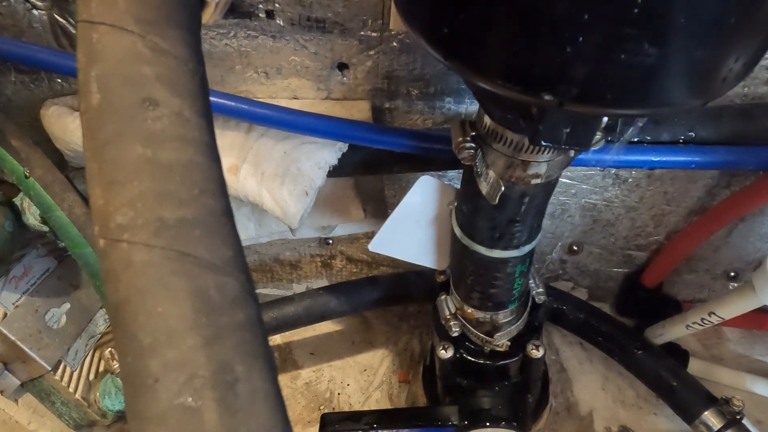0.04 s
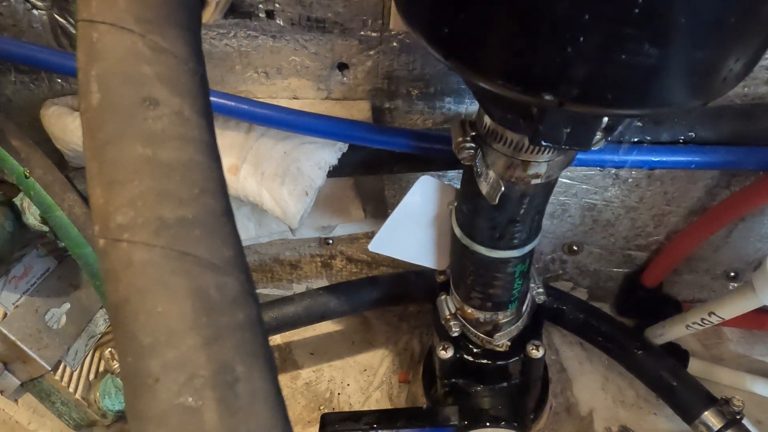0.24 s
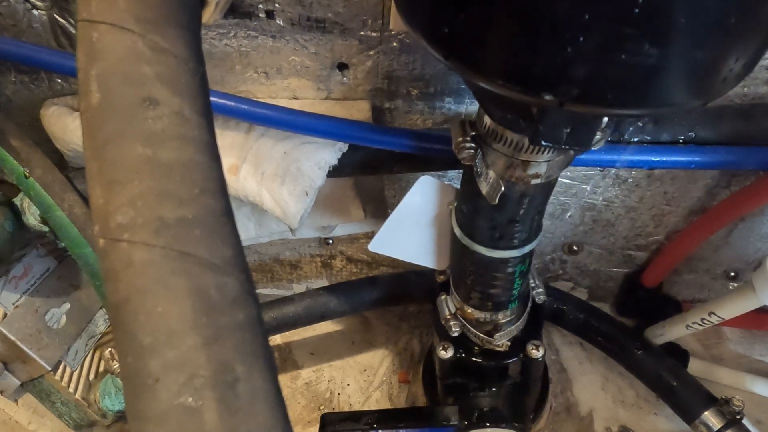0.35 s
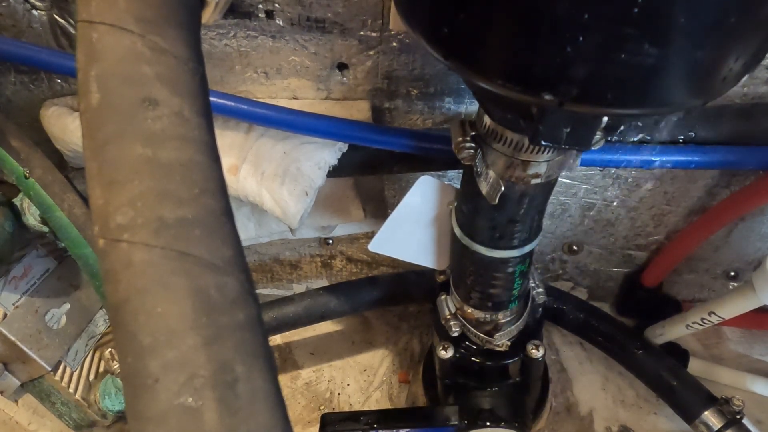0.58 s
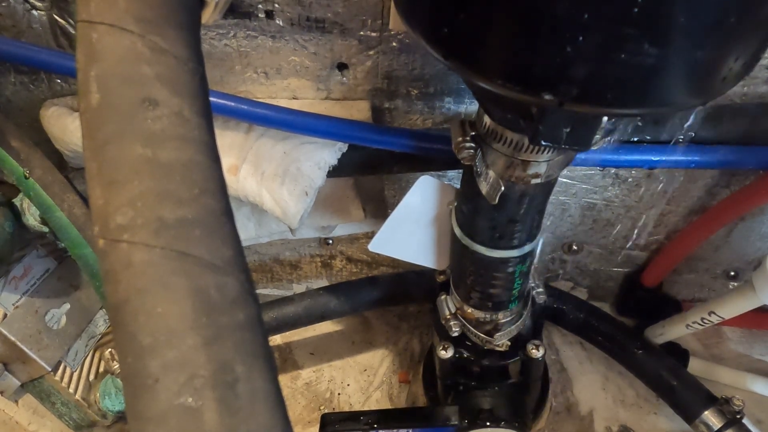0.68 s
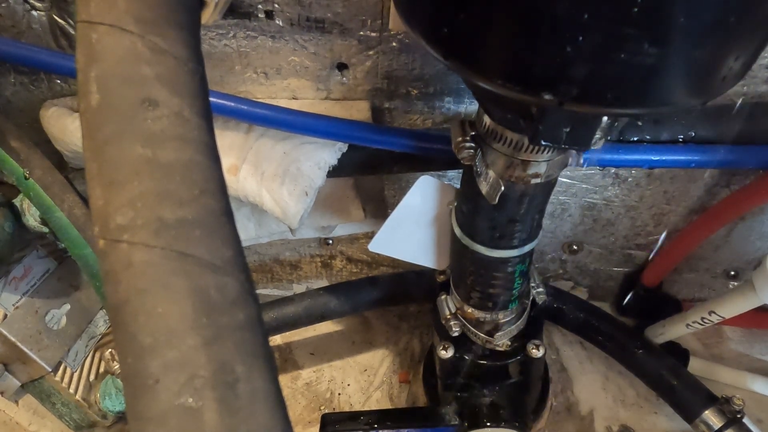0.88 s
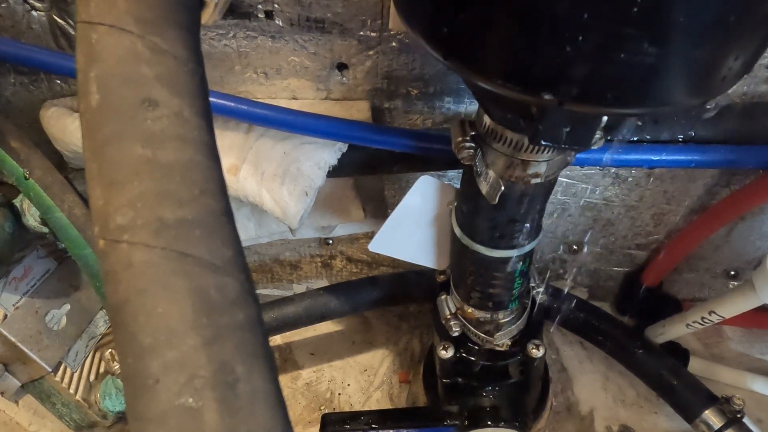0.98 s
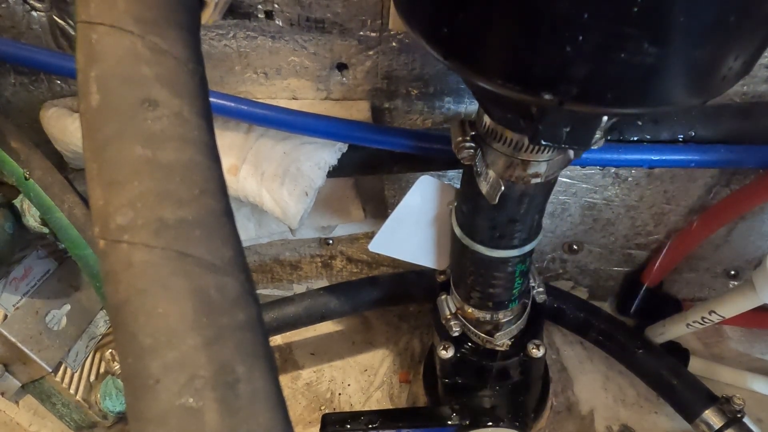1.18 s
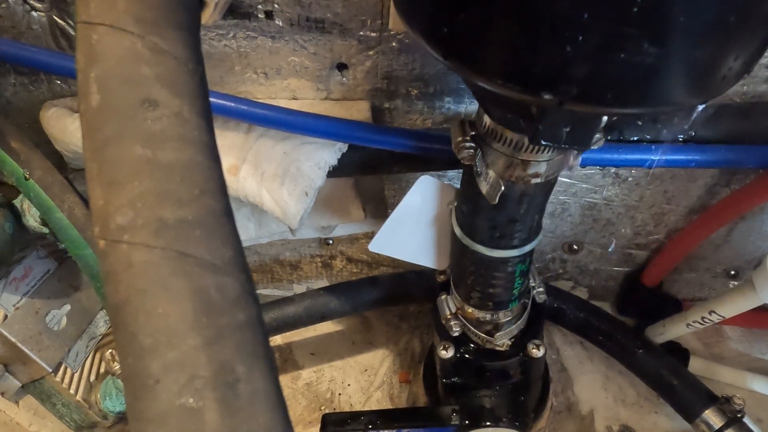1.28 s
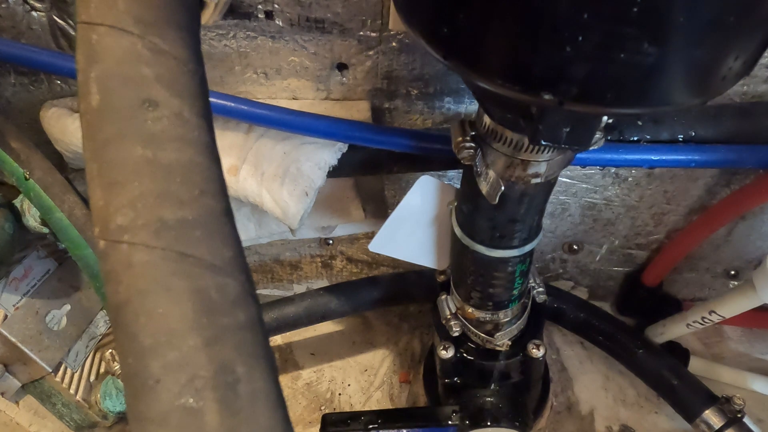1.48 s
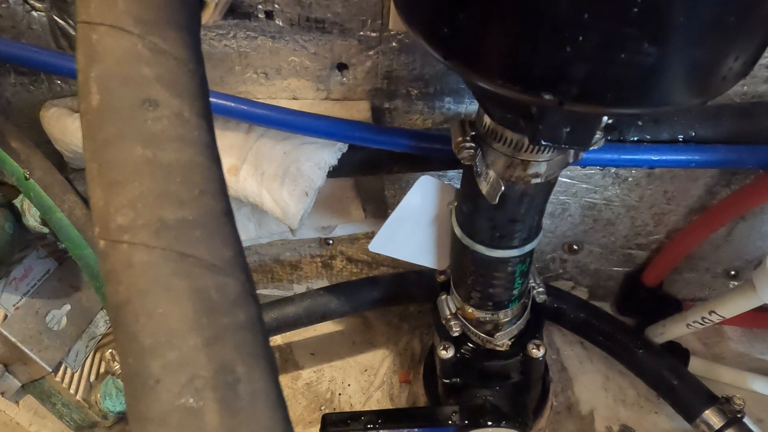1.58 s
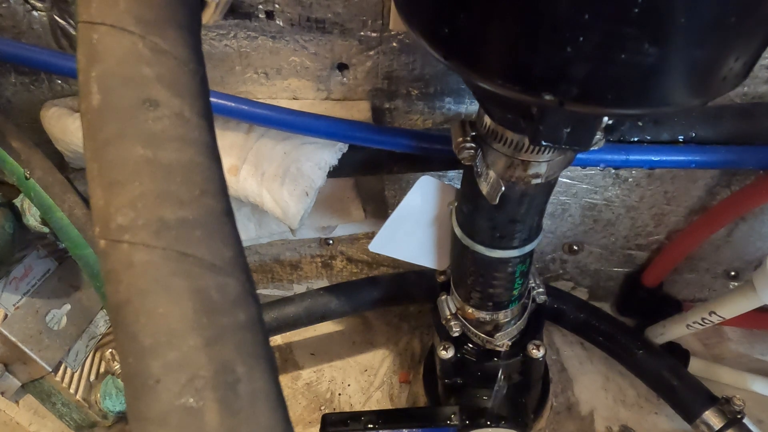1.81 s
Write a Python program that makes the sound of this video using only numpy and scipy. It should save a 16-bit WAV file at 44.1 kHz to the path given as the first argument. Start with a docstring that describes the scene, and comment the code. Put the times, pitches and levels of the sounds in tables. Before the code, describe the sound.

A leaky hose fitting spurts and drips water in uneven bursts over a faint hum.

```python
"""Water and air sputter from a leaking hose fitting in a boat's engine compartment.
A low hum and a faint drizzle run throughout. Spurts start at once: each is a cluster of tiny impacts
that rings the hose and housing (the low notes swell late) and throws spray. Puffs of mist and single
plinking droplets are scattered among the spurts. Near the end a fine jet, faint until then, grows
into a hiss. The cramped bay adds a short echo to the spurts, puffs and drops."""
import sys
import numpy as np
from scipy import signal
from scipy.fft import rfft, irfft, next_fast_len
from scipy.io import wavfile
from scipy.ndimage import uniform_filter1d

SR = 44100
rng = np.random.default_rng(int(sys.argv[2]) if len(sys.argv) > 2 else 0)


def generate_wav(sig):
    """Save sig (samples, or channels by samples) to the path in sys.argv[1] as 16-bit PCM at SR."""
    pcm = np.round(np.clip(np.atleast_2d(sig).T, -1, 1) * 32767).astype(np.int16)
    wavfile.write(sys.argv[1], SR, pcm)


N = 81585

# The housing's five pitch ranges, low to high: boom, thud, gulp, clack, knock.
# (delay [s], swell time [s], share of the small impacts it feels [0-1])
REGISTERS = [(0.0019, 0.0067, 0.23), (0.0021, 0.0049, 0.22), (.0008, 0.0025, 0.21),
             (0.00059, 0.00058, 0.85), (0.00048, 0.00033, 0.22)]
# Tone of the finest spray: (frequency [Hz], relative level [dB])
FIZZ_COLOUR = [(3000, -56), (5500, 13.5), (7300, 4.5), (8500, -8), (9150, -25), (10000, 0.5), (11000, 1.5),
               (12200, -21), (15500, -35)]
IMPACTS_PER_S, IMPACT_SPREAD_DB = 2000, 2


def undb(db):
    """Turn decibels into a number to multiply by."""
    return 10 ** (np.asarray(db) / 20)


def level(x, db):
    """Set a sound's average (rms) level."""
    return x * undb(db) / np.sqrt(np.mean(x ** 2) + 1e-20)


def burst_level(x, db, size=110):
    """Set the level of the loudest few milliseconds."""
    return x * undb(db) / np.sqrt(uniform_filter1d(x ** 2, size).max() + 1e-20)


def add(out, x, start_s):
    """Mix a sound in at a given time."""
    i = max(int(start_s * SR), 0)
    out[i:i + len(x)] += x[:max(len(out) - i, 0)]


def fade(t, t60):
    """Die away by 60 dB in t60 seconds, the fade time."""
    return np.exp(-np.log(1000) * t / t60)


def colour(x, points):
    """Shape a sound's tone along (frequency [Hz], level [dB]) points."""
    size = 2 * next_fast_len(len(x))
    hz, db = np.array(points, float).T
    freqs = np.maximum(np.fft.rfftfreq(size, 1 / SR), 1)
    gain = undb(np.interp(np.log(freqs), np.log(hz), db))
    cepstrum = irfft(np.log(gain))
    # Fold it in half so the filter rings only after a click, never before.
    cepstrum[1:size // 2] *= 2
    cepstrum[size // 2 + 1:] = 0
    return irfft(rfft(x, size) * np.exp(rfft(cepstrum)))[:len(x)]


def narrow_noise(hz, width_hz, db):
    """Noise squeezed around one pitch sounds like a wavering tone."""
    freqs = np.fft.rfftfreq(N, 1 / SR)
    spectrum = rfft(rng.standard_normal(N)) / (1 + (2 * (freqs - hz) / width_hz) ** 2)
    return level(irfft(spectrum, N), db)


def modes(t, rows):
    """A struck object rings with several fading notes at once."""
    return sum(undb(db) * fade(t, t60) * np.sin(2 * np.pi * hz * t) for hz, db, t60 in rows)


def impacts(count, per_s, spread_db):
    """Random clicks of uneven size, each a push or a pull."""
    hit = rng.random(count) < per_s / SR
    direction = np.sign(rng.standard_normal(count))
    return hit * direction * undb(spread_db * np.minimum(rng.standard_normal(count), 2))


def background():
    """A dull, steady rush and a low hum fill the compartment."""
    # Tone of the rush: (frequency [Hz], relative level [dB])
    rush_colour = [(20, -14), (50, -31), (130, 2), (200, -6), (330, -7.5), (520, -10.5), (750, -14),
                   (2500, -21.5), (4800, -27), (7200, -34.5), (9000, -45.5), (10700, -36.5), (14000, -60)]
    # Notes of the hum: (pitch [Hz], width [Hz], level [dB])
    hum_notes = [(50.6, 8.9, -63), (94.6, 4.2, -60.5)]
    rush = level(colour(rng.standard_normal(N), rush_colour), db=-50.5)
    return rush + sum(narrow_noise(*note) for note in hum_notes)


def housing(t):
    """One impact rings the hose and housing: one sound per pitch range, the low ones swelling late."""
    # Notes of the hose and housing: (pitch [Hz], relative level [dB], fade time [s])
    notes = [(91.6, -16, 0.42), (146.3, -11, .16), (176, -12, 0.21), (218.5, -11.5, 0.26),
             (254.1, 6.5, .14), (288.6, -0.5, 0.15), (333.8, 1, 0.12), (378.2, -6, 0.18),
             (476.7, -6.5, .11), (610, 6, 0.033), (893, 3, 0.032), (946.5, 4, 0.048), (981.4, 1.5, 0.061),
             (1048, -1.5, 0.043), (1116, -5.5, 0.096), (1173, -4.5, 0.1), (1261, -1.5, 0.063),
             (1360, 2, .022), (1461, -7, 0.048), (1684, -9.5, 0.049), (1768, 5.5, 0.021),
             (1955.5, 10, 0.025), (2063, 2.5, 0.05)]
    # Edges of the five pitch ranges: (lowest [Hz], highest [Hz])
    ranges = [(70, 300), (300, 650), (830, 1080), (1080, 1550), (1550, 2220)]
    rings = []
    for (low, high), (delay, swell, _) in zip(ranges, REGISTERS):
        age = np.maximum(t - delay, 0)
        ring = modes(age, [note for note in notes if low <= note[0] < high])
        onset = 1 - np.exp(-(age / swell) ** 2)
        band = signal.butter(2, [low, high], "bandpass", fs=SR, output="sos")
        rings.append(signal.sosfilt(band, ring * onset))
    return rings


def drizzle(rings):
    """Stray droplets tick all the time and faintly ring the housing."""
    drops = impacts(N, per_s=240, spread_db=-3.5)
    ticks = level(colour(drops, FIZZ_COLOUR), db=-77)
    ringing = level(signal.fftconvolve(drops, sum(rings))[:N], db=-72.5)
    return ticks + ringing


def spurts(t, rings):
    """A slap of water among tiny impacts rings the housing and fitting and throws spray."""
    # Spurts: (time [s], rise to the slap [s], cluster length [s], boom [dB], thud [dB],
    # gulp [dB], clack [dB], knock [dB], splash [dB], fizz [dB])
    events = [ (.017, 0.0011, .010, -32, -37, -41.5, -47, -36.5, -40, -43.5),
              (.036, 0.0064, .018, -34, -51, -46, -62, -39.5, -40.5, -42.5),
              (0.2347, 0.0014, .005, -33, -31, -24.5, -34, -27, -40, -57),
              (0.2392, 0.0037, .001, -55, -31, -20.5, -50, -30, -43, -64),
              (.291, 0, .004, -53, -54, -64, -52, -44.5, -50.5, -70),
              (.330, 0.0032, .024, -39, -52, -46, -51, -50.5, -55, -67),
              (.419, 0.00014, .008, -37, -38.5, -53, -60, -45, -47.5, -50),
              (.459, .008, .022, -23, -30, -21.5, -25, -17.5, -33, -50),
              (0.4748, 0, .007, -41, -31, -16.5, -27, -13, -27, -54),
              (0.4812, 0.00082, .007, -26, -20, -19.5, -25, -14, -28, -58),
              (.517, 0.0048, .005, -41, -36, -16, -32, -28.5, -53, -43),
              (0.5222, 0.00032, .003, -27.5, -38, -20.5, -23.5, -31.5, -37, -45),
              (0.531, 0.0009, .002, -60, -49, -26.5, -34, -45, -48, -66),
              (.617, 0.0025, .003, -66, -50, -47, -58, -71, -56, -54),
              (.645, 0.026, .027, -41, -45, -57, -51, -44.5, -45, -48.5),
              (.673, 0, .010, -46, -43, -48.5, -45, -39.5, -38, -38.5),
              (0.796, 0, .008, -45, -46.5, -55, -47.5, -52, -52, -64),
              (.863, 0.00013, .005, -56, -55, -62, -53, -56, -40.5, -39.5),
              (.898, 0.022, .036, -31.5, -33, -36, -41, -35.5, -46.5, -72),
              (.927, 0.004, .007, -32.5, -40, -27.5, -46, -24, -45, -63),
              (0.9362, .0061, .009, -31.5, -38, -27, -37, -25, -43, -55),
              (.973, 0.0029, .007, -33.5, -32.5, -26, -30, -33.5, -47, -73),
              (1.031, .012, .020, -28, -34.5, -30, -40, -35, -46.5, -76),
              (1.052, 0.0028, .003, -39.5, -40.5, -29, -43, -40, -68, -70),
              (1.088, 0.0027, .004, -34, -31.5, -27.5, -31.5, -27, -42.5, -51.5),
              (1.1215, 0.0011, .003, -33.5, -35.5, -27.5, -38, -30.5, -53, -61),
              (1.155, 0.0025, .002, -47, -46, -45, -46, -41.5, -49.5, -71),
              (1.197, 0.0077, .012, -64, -45.5, -61, -50, -45, -43.5, -55),
              (1.221, 0, .005, -43.5, -41, -42, -46, -35.5, -37, -46),
              (1.290, 0.0082, 0.0289, -39.5, -39, -45.5, -48, -46.5, -55, -57.5),
              (1.355, 0.00061, .0001, -36, -30.5, -31.5, -31, -18, -36, -71),
              (1.381, 0.0004, .004, -40, -43.5, -36.5, -45, -40.5, -56, -71),
              (1.470, 0.0011, .0001, -34, -28, -27.5, -21.5, -13.5, -28, -48),
              (1.565, 0.0087, .012, -42, -37, -33.5, -43, -37, -42.5, -52.5),
              (1.5891, 0.0011, .0005, -35.5, -36, -40, -37.5, -27.5, -31.5, -44)]
    # Short, bright notes of the metal fitting: (pitch [Hz], relative level [dB], fade time [s])
    fitting_notes = [(2696, 7.5, 0.043), (3020, -2, 0.013), (3400, 8, 0.009), (4440, 9.5, 0.012),
                     (4307, 14, 0.015), (4785, 10, 0.019), (6940, -13, 0.0068)]
    # Tone of the splashing spray: (frequency [Hz], relative level [dB])
    splash_colour = [(1200, -80.5), (2400, -22), (2800, 14.5), (3200, 3), (3800, 6.5), (4400, 0),
                     (5000, -7), (6000, -15), (7500, -10), (12000, -38.5)]
    out = np.zeros(N)
    onset = 1 - np.exp(-t / 0.00011)
    fitting = burst_level(modes(t, fitting_notes) * onset, db=0.5)
    # The bass feels mostly the slap; splash and fizz feel every impact in full.
    shares = [share for _, _, share in REGISTERS] + [1, 1]
    for start, rise, length, *levels in events:
        build_up = np.minimum(t / max(rise, 1 / SR), 1)
        cluster = impacts(len(t), IMPACTS_PER_S, IMPACT_SPREAD_DB) * (t < length) * build_up
        slap = 0.74 * signal.unit_impulse(len(t), int(rise * SR))
        spray = colour(rng.standard_normal(len(t)) * fade(t, t60=0.031), splash_colour)
        splash = burst_level(spray, db=0) + fitting
        fizz = colour(rng.standard_normal(len(t)) * fade(t, t60=0.0093) * onset, FIZZ_COLOUR)
        for response, share, db in zip(rings + [splash, fizz], shares, levels):
            struck = signal.fftconvolve(slap + share * cluster, response)[:len(t)]
            add(out, burst_level(struck, db), start)
    return out


def spits(t):
    """Air blows puffs of fine mist through the leak."""
    # Puffs, each loudest halfway through its length: (time [s], length [s], level [dB])
    puffs = [(0.017, 0.0017, -42), (0.047, .006, -53.5), (0.095, .003, -59), (0.431, 0.002, -50.5),
             (0.73, 0.0091, -61.5), (0.754, 0.0064, -41.5), (0.863, 0.0025, -42), (0.893, 0.014, -51.5),
             (1.166, 0.0098, -54.5)]
    # Tone of the mist: (frequency [Hz], relative level [dB])
    mist_colour = [(3000, -4), (6000, -5), (7500, -1), (8500, 1), (9150, -13), (10000, 8), (11000, 6),
                   (12500, -10), (15500, -17)]
    out = np.zeros(N)
    for start, length, db in puffs:
        air = rng.standard_normal(len(t))
        specks = 2 * impacts(len(t), IMPACTS_PER_S, IMPACT_SPREAD_DB)
        puff = t * np.exp(-2 * t / length) * (air + specks)
        add(out, burst_level(colour(puff, mist_colour), db), start)
    return out


def plinks(t):
    """Each droplet's tiny bubble swells for a few cycles and leaves a wet tail around its pitch."""
    # Single droplets: (time [s], pitch [Hz], level [dB])
    droplets = [(.128, 4210, -23.5), (0.129, 3360, -32), (0.17, 7220, -38), (.282, 4300, -40),
                (.331, 5300, -38), (.967, 7040, -39.5), (1.042, 4400, -36.5), (1.091, 4300, -36),
                (1.312, 10940, -60), (1.417, 7100, -55), (1.473, 2870, -23)]
    swell_s = 0.0009
    age = t / swell_s
    out = np.zeros(N)
    for start, hz, db in droplets:
        bubble = age ** 2 * np.exp(1 - age ** 2) * np.sin(2 * np.pi * hz * t)
        wet_tone = narrow_noise(hz, width_hz=0.26 * hz, db=-6)[:len(t)]
        tail = wet_tone * fade(t, t60=0.022) * (1 - np.exp(-age ** 2))
        add(out, undb(db) * (bubble + tail), start)
    return out


def jet():
    """A fine jet hisses and whistles louder as the flow steadies."""
    # Growth of the jet: (time [s], level [dB])
    growth = [(0, -69), (.6, -62.5), (1.25, -57), (1.449, -51), (1.653, -49.5), (1.85, -46.5)]
    # Tone of the hiss: (frequency [Hz], relative level [dB])
    hiss_colour = [(100, -19), (250, -19), (370, 6.5), (560, -2), (1400, -16.5), (2300, -12.5),
                   (3100, -9.5), (3600, -13.5), (4400, -12.5), (5600, -14), (7200, -28.5), (8400, -32),
                   (9100, -57), (10000, -24), (11000, -33.5), (15000, -49)]
    hiss = level(colour(rng.standard_normal(N), hiss_colour), db=0)
    whistle = narrow_noise(hz=3574, width_hz=260, db=-6.5)  # level relative to the hiss
    times, levels = np.array(growth).T
    return (hiss + whistle) * undb(np.interp(np.arange(N) / SR, times, levels))


def bay(x, t):
    """Echoes from the close walls blur into a short tail; the bass lingers longest."""
    # Bands of the echo: (frequency [Hz], fade time [s], level [dB])
    bands = [(137, 0.56, -13.5), (404, 0.18, -6), (1110, 0.15, -15.5), (2410, 0.14, -19), (5730, 0.061, -7),
             (13300, 0.17, -7.5)]
    log_freqs = np.log(np.maximum(np.fft.rfftfreq(len(t), 1 / SR), 1))
    log_centres = np.log([hz for hz, _, _ in bands])
    spectrum = rfft(rng.standard_normal(len(t)))
    tail = 0
    for this_band, (_, t60, db) in zip(np.eye(len(bands)), bands):
        shape = fade(t, t60) * (1 - np.exp(-t / 0.0031))
        noise = irfft(spectrum * np.interp(log_freqs, log_centres, this_band), len(t))
        tail = tail + undb(db) * noise * shape / np.sqrt(np.sum(shape ** 2))
    return x + signal.fftconvolve(x, tail)[:N]


def scene():
    """The leak echoes in the engine bay, over the jet and the background, in one channel."""
    t = np.arange(12000) / SR  # clock for one short sound, in seconds
    rings = housing(t)
    leak = spurts(t, rings) + spits(t) + plinks(t) + drizzle(rings)
    return (bay(leak, t) + jet() + background())[None]


def record(dry):
    """Cut away the very highest treble."""
    top_hz = 15400
    return signal.sosfilt(signal.ellip(8, .2, 70, top_hz, fs=SR, output="sos"), dry)


dry = scene()
out = record(dry)
generate_wav(out)
```